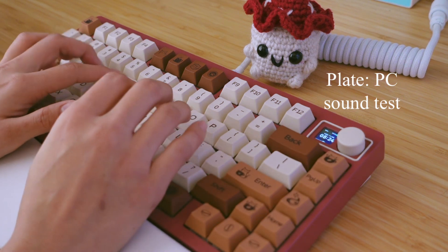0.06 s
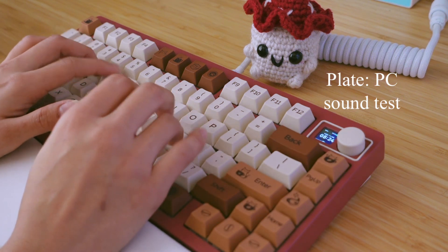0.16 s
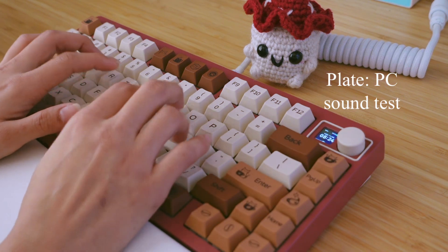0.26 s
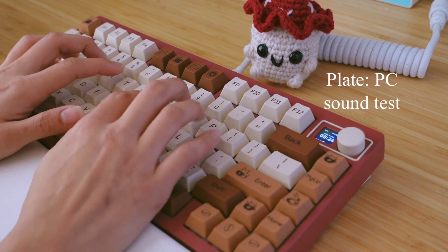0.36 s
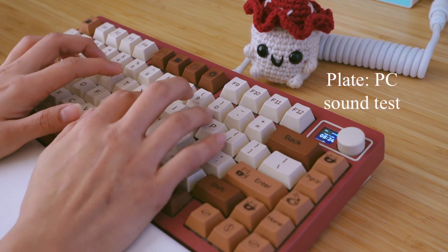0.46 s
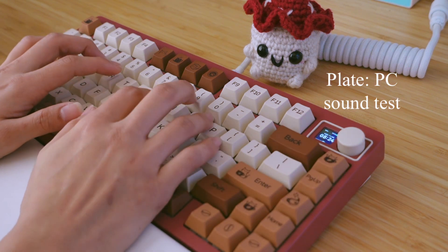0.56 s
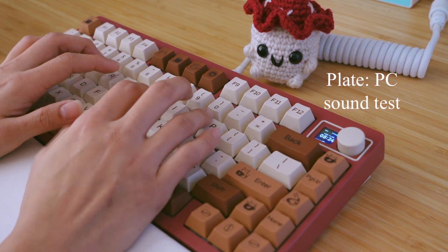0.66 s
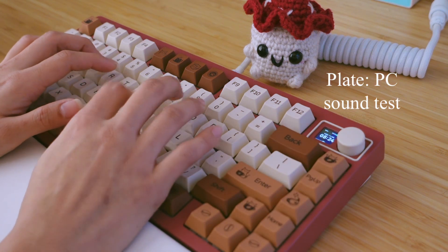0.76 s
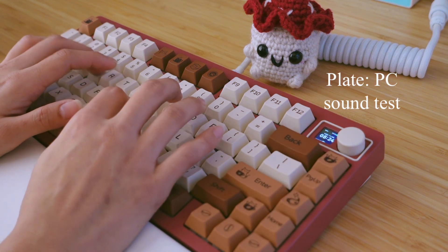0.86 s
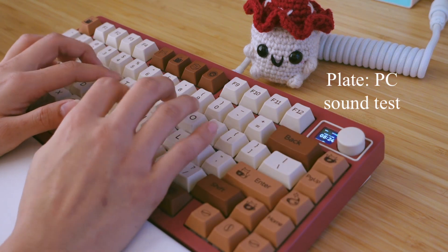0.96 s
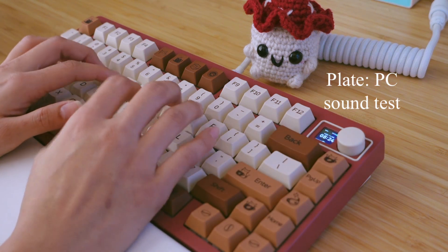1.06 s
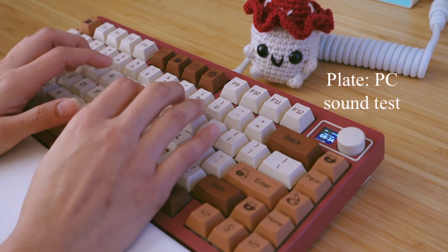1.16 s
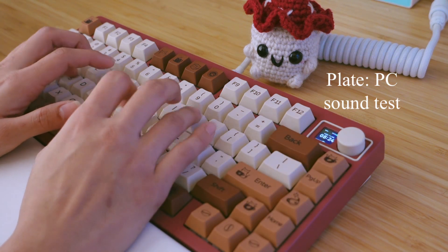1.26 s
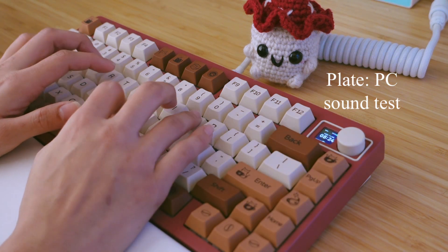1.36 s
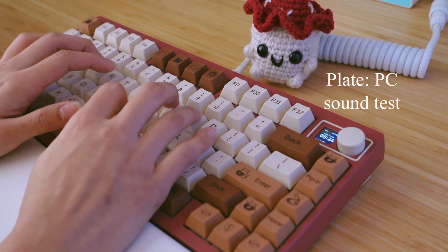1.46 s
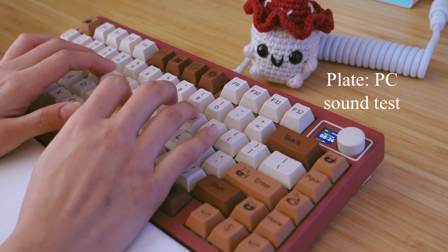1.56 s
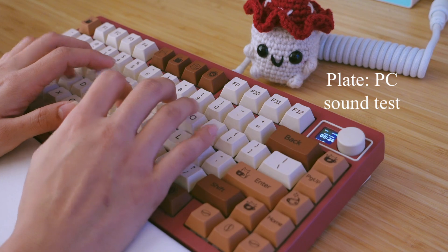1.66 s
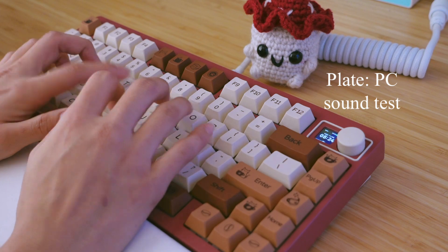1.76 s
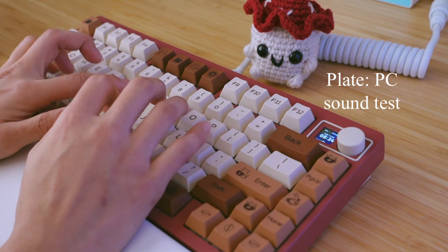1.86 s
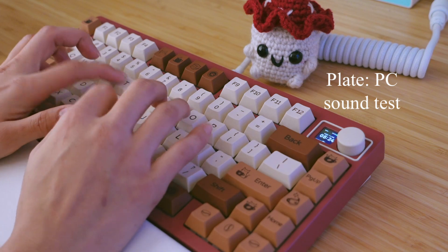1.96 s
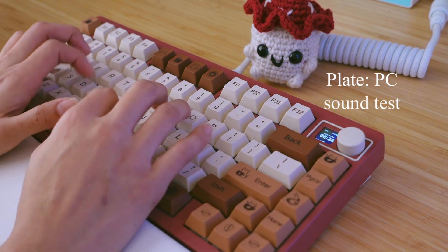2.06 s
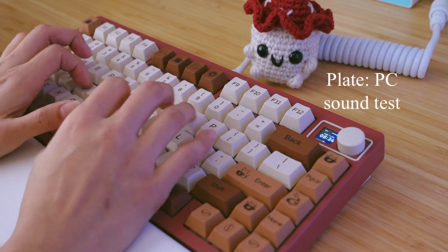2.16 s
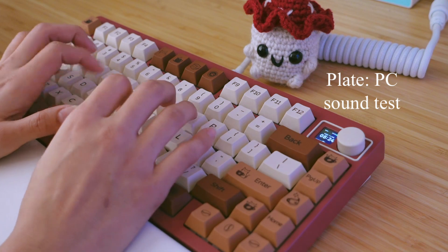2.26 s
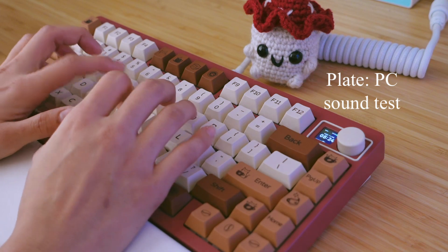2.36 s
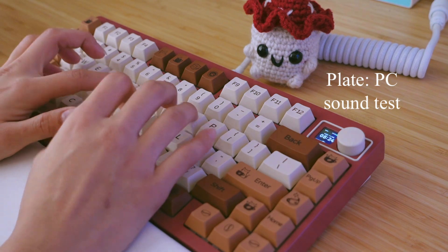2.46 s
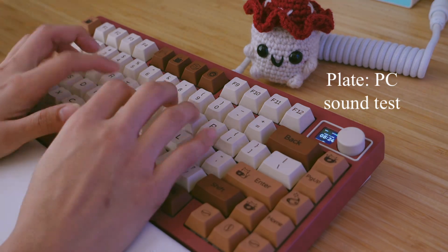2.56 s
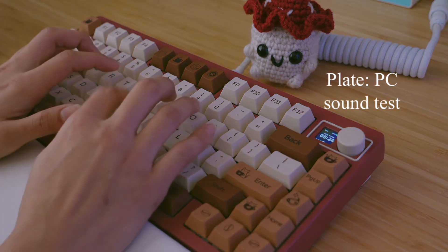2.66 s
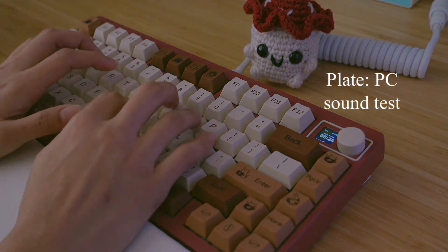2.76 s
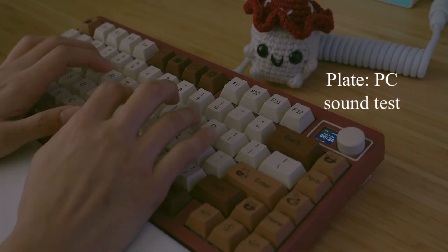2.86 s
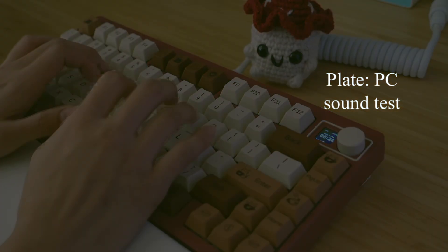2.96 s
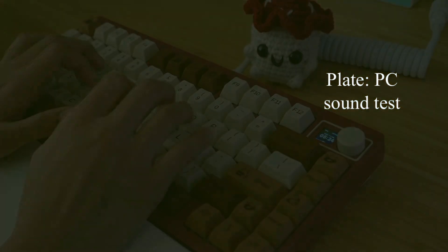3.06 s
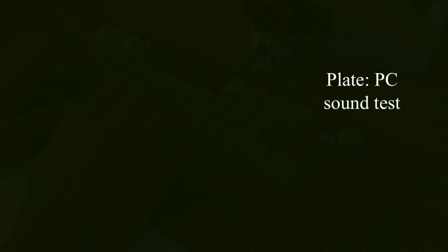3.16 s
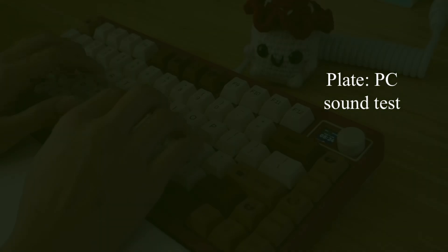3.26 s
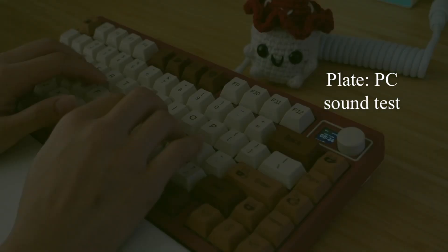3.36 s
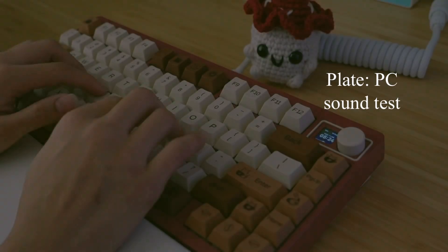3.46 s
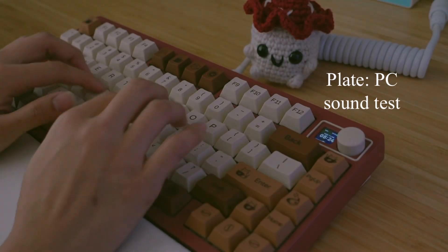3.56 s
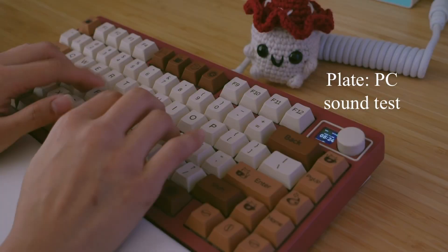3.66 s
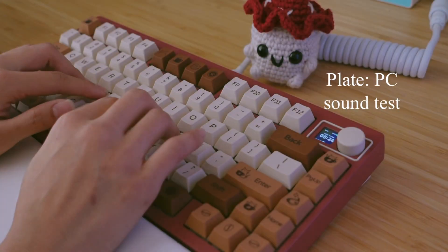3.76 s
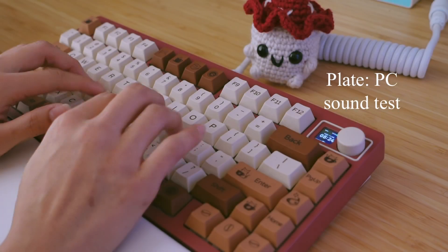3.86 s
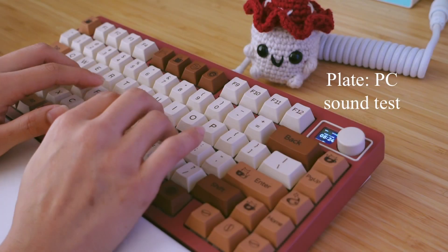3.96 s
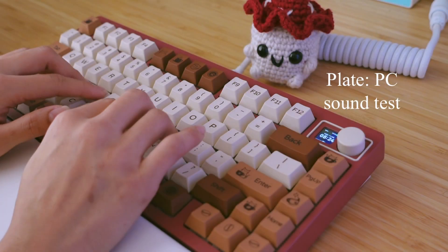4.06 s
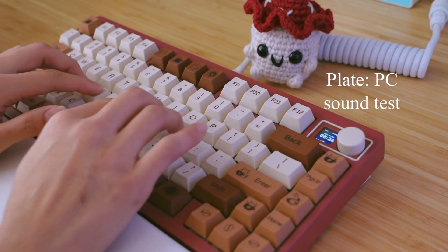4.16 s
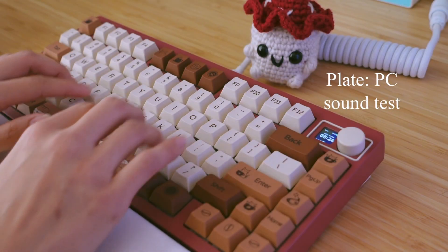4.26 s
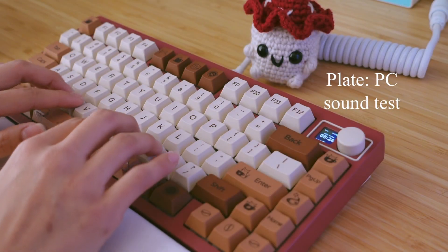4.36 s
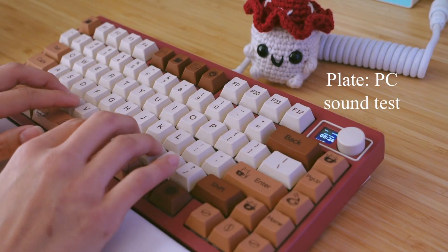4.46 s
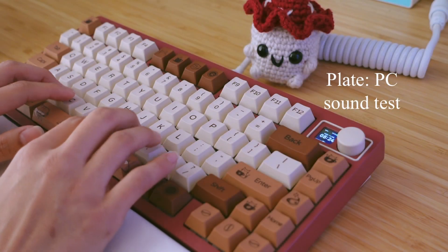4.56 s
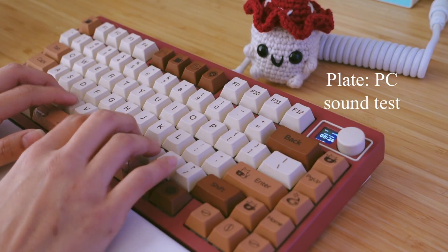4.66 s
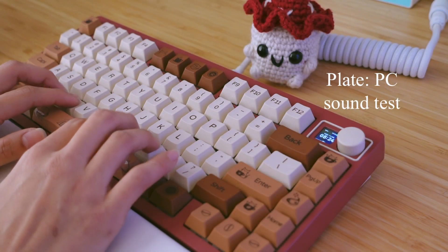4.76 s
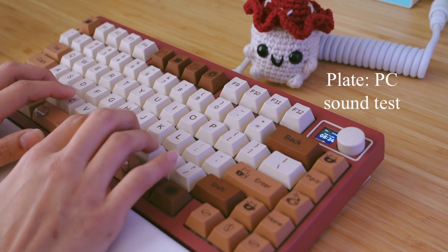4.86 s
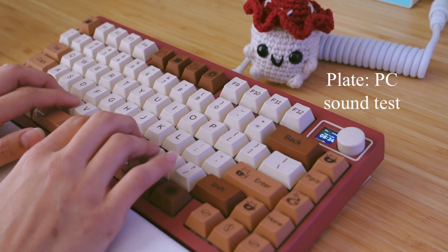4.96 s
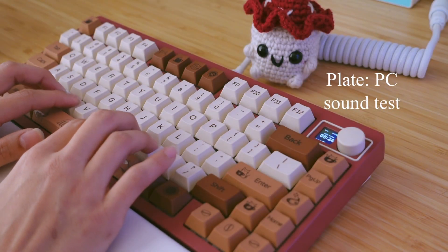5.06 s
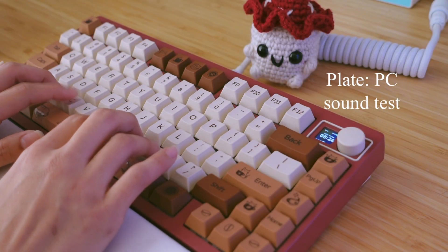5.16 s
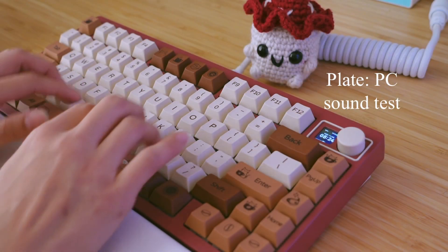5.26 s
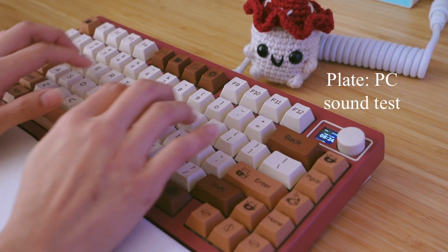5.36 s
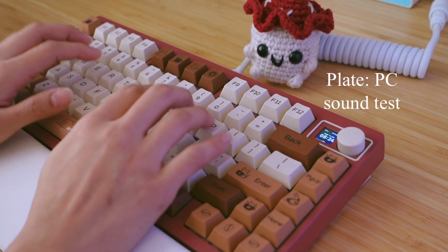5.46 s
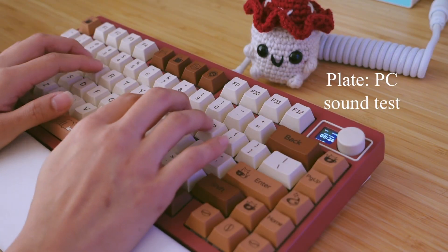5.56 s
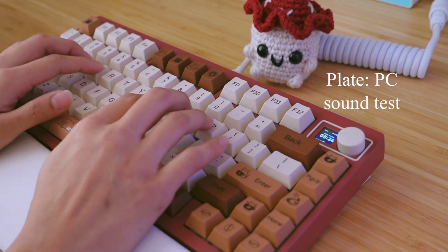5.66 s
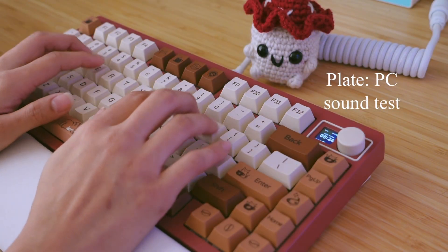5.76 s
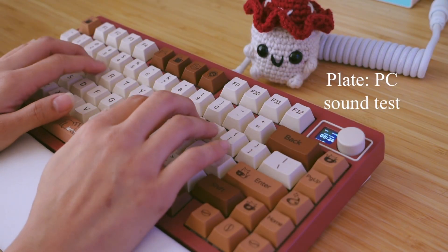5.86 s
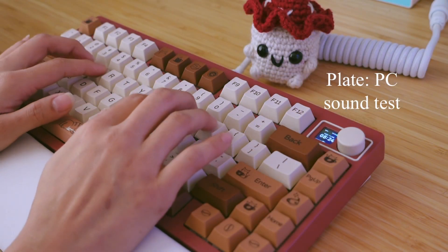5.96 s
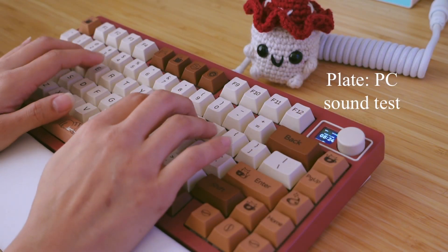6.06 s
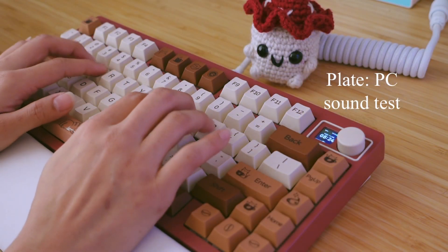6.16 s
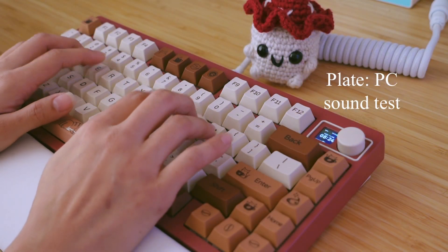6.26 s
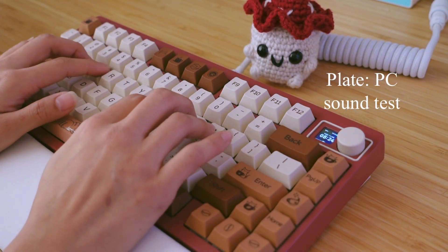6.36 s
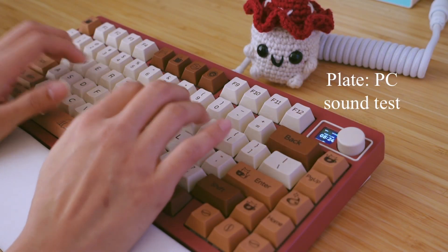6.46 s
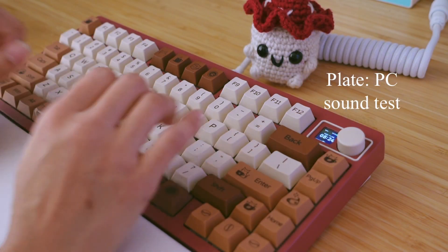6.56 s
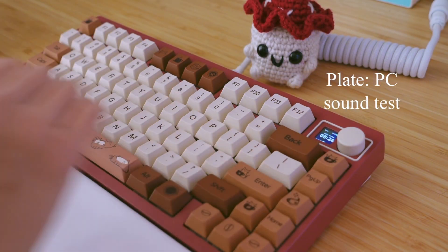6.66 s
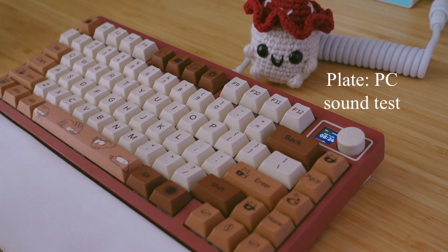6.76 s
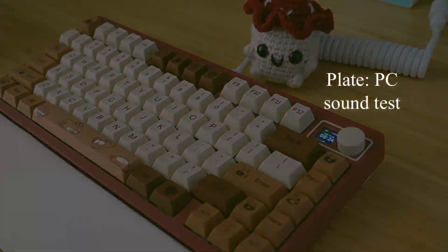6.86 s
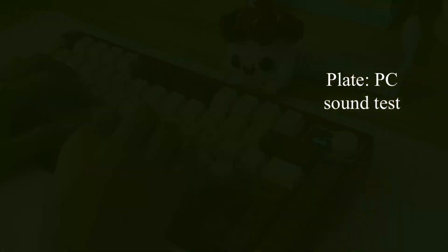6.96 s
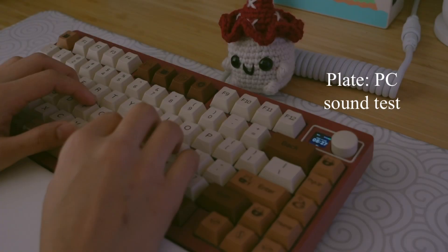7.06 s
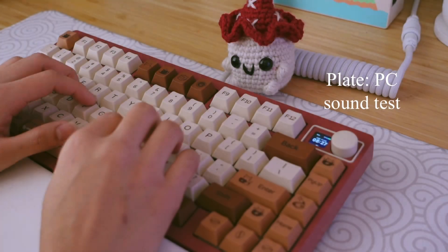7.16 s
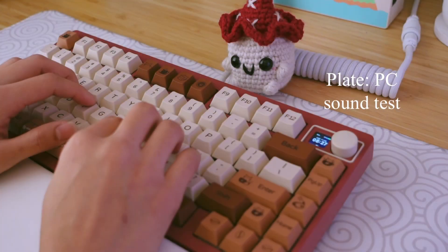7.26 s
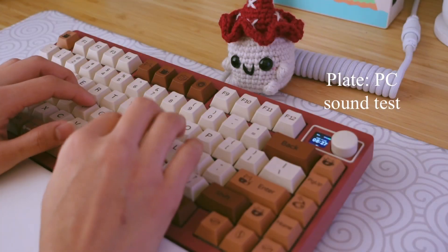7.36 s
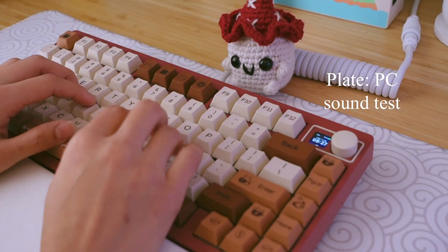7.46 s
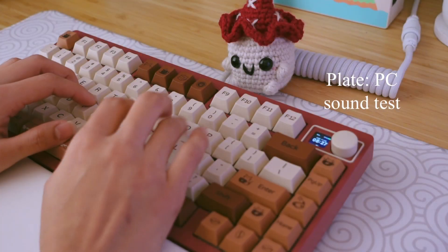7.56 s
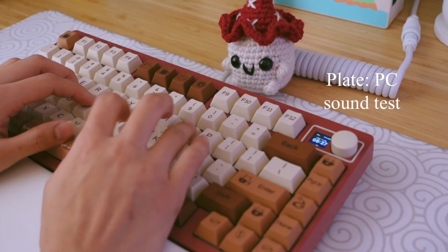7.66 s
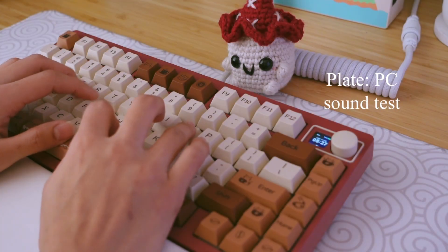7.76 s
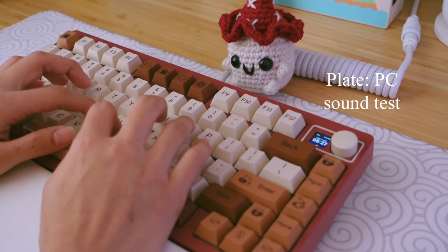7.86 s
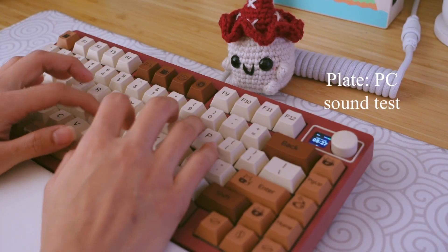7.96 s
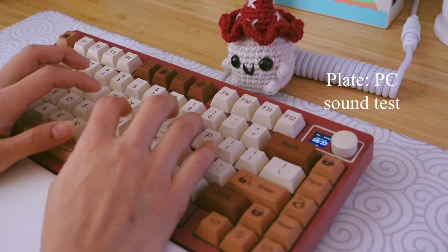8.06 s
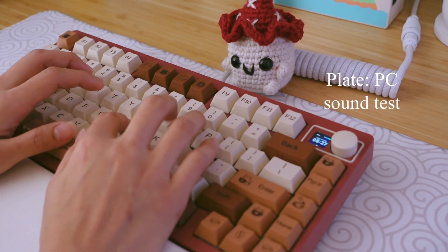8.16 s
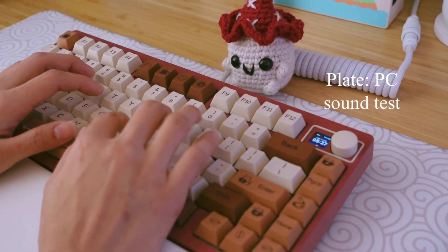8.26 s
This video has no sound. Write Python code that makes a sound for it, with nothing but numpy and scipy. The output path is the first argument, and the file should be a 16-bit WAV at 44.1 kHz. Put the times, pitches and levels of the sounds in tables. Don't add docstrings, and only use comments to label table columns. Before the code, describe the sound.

Close mechanical keyboard clatter at a wooden desk: steady words, fast rolling bursts with short gaps, then steady typing again on a mat.

```python
import sys
import numpy as np
from scipy import signal
from scipy.fft import rfft, irfft, next_fast_len
from scipy.io import wavfile
from scipy.ndimage import map_coordinates

SR = 44100
rng = np.random.default_rng(int(sys.argv[2]) if len(sys.argv) > 2 else 0)


def waveform_to_disk(signal):
    frames = np.transpose(np.atleast_2d(signal))
    scaled = np.clip(frames, -1, 1) * 32767
    samples = np.round(scaled).astype(np.int16)
    wavfile.write(sys.argv[1], SR, samples)


def volts_from_decibels(level):
    exponent = np.asarray(level, float) / 20
    return 10 ** exponent


N = 366910
SPAN = 4096

# start in seconds, knock in dB, keycap in Hz,
# plate in dB over the knock, tick in dB over the knock.
UPPER_ROLLS = [(3.3694, -19.5, 2700, -12, -3), (3.406, -20.5, 2160, -3, -1.5),
               (3.4269, -16.5, 2600.0, -11, -3), (3.469, -25, 2550, -18, -9),
               (3.491, -17.0, 2600, -37.0, -6.5), (3.532, -26, 2470, -5.5, -10.0),
               (3.5418, -25, 2330.0, -7, -12), (3.691, -28, 2340, -15, 6), (3.693, -16, 2760.0, -10, -7),
               (3.703, -17.5, 2530, -11, -2.5), (3.7389, -23, 2560.0, -13, -2),
               (3.7685, -21.5, 2500.0, -20, -9.0), (3.7748, -18.5, 2410.0, -21, -6),
               (3.845, -26, 2480.0, -4.5, -6), (3.86, -29.5, 2400, -1, -6), (4.0076, -20.5, 2900, -16, -6),
               (4.05, -28, 2600, -13, -10), (4.0153, -28, 2200, -5, -4), (4.0471, -21, 2600.0, -14.0, -7),
               (4.0724, -21, 2470, -21, -6.5), (4.115, -27, 2660, -26, -12), (4.1995, -27, 2190, -8, -3)]
# start in seconds, knock in dB, keycap in Hz,
# plate in dB over the knock, tick in dB over the knock.
MAT_WORDS = [(7.51, -18, 2420, -24, -3.5), (7.5854, -17, 2140, -13, -6), (7.6877, -11, 2430, -22, -5),
             (7.8229, -13, 2560, -14, -12), (7.9149, -20.5, 2400, -18, -10),
             (7.945, -22.5, 2130, -4, -11.5), (8.0243, -14, 2260, -11, -7.5), (8.1446, -18, 2500, -8.5, -7),
             (8.203, -14.5, 2430, -28.0, -6), (8.2702, -16, 2480, -16, -12.5)]


def along(points, hz):
    f, v = np.transpose(points)
    return np.interp(np.log(hz + 1), np.log(f + 1), v)


def mode(f, hz, width_hz):
    return 1j * f * width_hz / (hz * hz - f * f + 1j * f * width_hz)


def dying(t, db, t60):
    return volts_from_decibels(db - 60 * t / t60)


def peaked(response):
    return response / np.abs(irfft(response, SPAN)).max(-1, keepdims=True)


def place(times, sounds):
    out = np.zeros((2, N + SR))
    for s, sound in zip(times, sounds):
        out[:, round(s * SR):][:, :sound.shape[-1]] += sound
    return out[:, :N]


def spread(a, b, alike):
    u = np.arccos(np.clip(alike, 0, 1)) / 2
    return np.cos(u) * a + np.sin(u) * b, np.cos(u) * a - np.sin(u) * b


def scatter(rows, alike):
    a, b = np.moveaxis(rng.standard_normal((rows, 2, SPAN)), 1, 0)
    return np.stack(spread(a, b, alike), 1)


def chances(rows, count):
    return rng.standard_normal((rows, count)).T[:, :, None, None]


def per_key(table, s, usual):
    at, value = np.transpose(table)
    apart = np.abs(s[:, None] - at)
    return np.where(apart.min(1) < .002, value[apart.argmin(1)], usual)


def thuds(rows, hz, width_hz, t60, db, push_db=-20):
    s, level_db = np.transpose(rows)[:, :, None, None]
    f = np.fft.rfftfreq(SPAN, 1 / SR)
    puff = dying(np.arange(SPAN) / SR, 0, t60) * scatter(len(s), alike=0.97)
    knock = irfft((volts_from_decibels(push_db) + rfft(puff)) * mode(f, hz, width_hz) ** 2, SPAN)
    return place(s.ravel(), volts_from_decibels(level_db + db) * knock / np.abs(knock).max((1, 2), keepdims=True))


def air():
    # frequency in Hz, level in dB per Hz.
    hiss = [(25, -50), (60, -26.5), (100, -15.5), (125, -6), (250, -6), (370, -10), (700, -15), (1900, -21),
            (2700, -27), (4000, -33), (6500, -39.5), (10000, -44.5), (15000, -46), (16600, -53)]
    # frequency in Hz, width in Hz, level in dB over the hiss.
    ducts = [(215.5, 17, 11.5), (314.5, 10.5, 9.5), (995, 3.6, 0), (2335, 10, -9), (4274, 68, 8.5)]
    # time in seconds, level in dB.
    loudness = [(0.0, -45.5), (0.88, -45), (6.7, -46), (7.1, -47), (8.32, -46)]
    # frequency in Hz, likeness from 0 to 1.
    likeness = [(60, 0.97), (380, 0.95), (2380, 0.61), (15000, 0.74)]
    # frequency in Hz, left minus right in dB.
    lean = [(60, 1.5), (380, -3), (2380, -4), (15000, 1.5)]
    t, m = np.arange(N) / SR, next_fast_len(N)
    f = np.fft.rfftfreq(m, 1 / SR)
    a, b = rfft(rng.standard_normal((2, m)))
    pair = np.array(spread(a, b, along(likeness, f)))
    lines = sum(volts_from_decibels(g) * np.abs(mode(f, hz, width)) ** 2 for hz, width, g in ducts)
    colour = volts_from_decibels(along(hiss, f)) * (1 + lines)
    noise = irfft(colour * pair * volts_from_decibels(np.outer([.5, -.5], along(lean, f))), m)[:, :N]
    drift_db = 0.8 * map_coordinates(rng.standard_normal(64), [t * 3])
    level_db = np.interp(t, *np.transpose(loudness)) + 1.5 + drift_db
    return volts_from_decibels(level_db) * noise / noise.std()


def contacts():
    # start in seconds, knock in dB, keycap in Hz, plate and tick in dB over the knock.
    words = [(0.064, -14.5, 2500.0, -23, -5), (0.1182, -17.5, 2640, -17, -1.5),
             (0.172, -17.5, 1920, -8, -12), (0.2252, -14.5, 2600.0, -15, -2),
             (0.3006, -22.5, 2500.0, -9, -13), (0.587, -24, 2940, -9, -14), (0.7473, -23.5, 2500, -5, -8),
             (0.835, -19, 2520.0, -19.0, -7.5), (0.9084, -17.5, 2710, -16, -3.5),
             (0.9768, -15.5, 2600.0, -15, -5.5), (1.0778, -20, 2600.0, -16, -5),
             (1.157, -21, 2500.0, -6.5, -5.5), (1.3334, -14.0, 2600, -11.5, -10),
             (1.423, -13.5, 2720, -9, -10), (1.526, -20.5, 2380, -7, -12), (1.586, -14.5, 2820, -12, -2.5),
             (1.7275, -14.5, 2650, -8, -2), (1.8503, -14.5, 2380.0, -12, -8.5),
             (1.9234, -10, 1990, -16, -8.5), (2.031, -12.5, 2740, -12, -10),
             (2.2501, -16.5, 2360, -8.5, -8.5), (2.3405, -12.5, 2030, -41, -6),
             (2.4557, -16.5, 2400, -13, -9), (2.5478, -18.0, 2380, -3.5, -8), (2.6627, -15, 2870, -9.5, -6),
             (2.7582, -19, 2600.0, -21, -11), (2.8026, -10, 2600, -15, -8), (2.8755, -27, 2430.0, -4, -10),
             (2.9334, -15.5, 2700, -12.5, -2)]
    middle = [(4.6806, -18.0, 2770, -4.5, -6.5), (4.6932, -23.5, 2200, -7, -18),
              (4.7224, -16, 2620, -2, -10), (4.7579, -18.5, 2370, -2.5, -10),
              (4.921, -22.5, 2040, -18, -14), (4.9435, -18, 2730, -5.5, -9),
              (4.9737, -20.5, 2730, -10.0, -20), (4.986, -20.5, 2500, -2.5, -12),
              (5.0175, -16.5, 2600.0, -7.5, -10), (5.079, -18.5, 2430, -4, -8.5),
              (5.206, -20.5, 2650, -8.5, -10.5), (5.256, -23, 2700.0, -4.5, -20),
              (5.3113, -26.5, 2330, 4.5, -34)]
    mash = [(5.8294, -19, 2820, -10, -3), (5.8314, -15, 2270, -8.5, -8), (5.857, -17.5, 2600.0, -11.5, -8),
            (5.8704, -22.5, 2900, -6, -1), (5.9073, -14, 2540.0, -12.5, -8),
            (5.9259, -18.5, 2600.0, -13, -1), (6.073, -16, 2660, -10, -8), (6.084, -10, 2430, -17, -9),
            (6.129, -16.5, 2560, -12, -7), (6.1647, -19.5, 2510, -11, -2.5),
            (6.3055, -16.5, 2700, -7.5, -5), (6.324, -14, 2600.0, -11, -13),
            (6.327, -14.5, 2270, -17.0, -8), (6.341, -17.5, 2640, -2.5, -2), (6.351, -9.5, 2500.0, -16, -8),
            (6.3706, -18.5, 2670, -13, -2), (6.4571, -26.5, 2200, -4, 3), (6.477, -24, 2440.0, -7, -27)]
    # start in
    # seconds, knock in dB, plate in dB over the knock.
    returns = [(0.193, -32, -3), (0.29, -32, 0), (0.45, -33.5, -11), (0.561, -40.5, -42), (0.658, -39.5, 2),
               (0.681, -36.5, -5), (0.933, -31, -6), (1.133, -35.5, 0.5), (1.2652, -35, -3.5),
               (1.323, -54.5, 17), (1.5547, -35.5, 11), (1.6296, -49, 8), (1.685, -40.5, 10),
               (1.8472, -46, -11), (1.98, -34, 0), (2.0678, -36.5, 4.5), (2.148, -32.5, 6),
               (2.1766, -28.5, -24), (2.532, -40, 11.5), (2.652, -37, -2), (3.0875, -37, 0.5),
               (5.298, -38, 9), (5.302, -38, 9), (7.029, -46, -23), (7.0824, -45, -21), (7.9014, -30, -5),
               (8.016, -28, 0),
               (3.524, -38, 5), (3.5944, -42, -2), (3.613, -31, -9), (3.8976, -31, -9), (3.914, -33, -5),
                (3.9677, -41, -32), (4.1673, -29.5, -4), (4.228, -33.5, -3), (4.317, -40.5, -27),
                (4.807, -40, 11), (4.819, -33, -2), (4.831, -42, 9), (4.8766, -34, 6.5), (4.882, -29.5, 2),
                (5.102, -45, 13), (5.114, -42, 10), (5.136, -41, 13.5), (5.217, -33, 0), (5.2836, -41, 8),
                (5.2862, -42, 8), (5.2918, -33.5, 10), (5.296, -33, 1), (5.316, -36, 0), (5.322, -38, -3),
                (5.294, -32, -3), (5.946, -33, -12), (5.9665, -41, 10.5), (6.0295, -37.5, 2.5),
                (6.051, -38.5, 1), (6.117, -31, 0), (6.194, -41, 10), (6.202, -34, -5), (6.212, -45.5, 11),
                (6.219, -40.5, 8), (6.246, -33, -3), (6.4594, -35.5, 9.5), (6.4634, -33, -1),
                (6.466, -32, -5), (6.4674, -30, -4), (5.52, -44.5, 10.5)]
    # start in seconds, knock in dB, tick in dB over the knock.
    rubbing = [(0.0928, -37.5, 7), (0.825, -48, 3), (0.8818, -39.5, 2.5), (0.95, -42, 2),
               (1.2255, -43.5, 4.5), (1.3979, -31, -2), (1.566, -34, -3), (1.7052, -36, 0),
               (2.006, -30.5, -2), (2.1303, -35.5, -3.5), (2.646, -51.5, 11), (2.7963, -58, -14.5),
               (2.8677, -47, 4), (2.9073, -37, -5), (3.392, -47, 4), (3.476, -48, -12), (3.6364, -39, -4),
               (3.6517, -34, -5), (4.187, -32, -12), (4.1916, -33, -5), (4.2101, -35, -4), (5.249, -37, -7),
               (5.996, -39, -12), (6.573, -39.5, -21), (6.6159, -32, -0.5), (7.496, -37, -4),
               (7.7877, -36.5, -11), (7.889, -45, -4), (8.125, -48, 0)]
    # start in seconds, push on the desk in dB, thin top of the slider in dB,
    # slider tick in dB over the knock.
    passages = [
        (0, 0.5, -1, -38),
        (3.2, 0.5, -20, -23),
        (4.5, -2, -7.5, -23),
        (5.6, 0.5, -6, -14),
        (6.8, -11, -10, -20),
    ]
    passage_plate_hz = [1328, 1245, 1250, 1245, 1250]
    passage_shell_db = [-8, -5.5, -9, -3, -6.5]
    # start in seconds, plate in Hz.
    spots = [(0.1183, 1490), (0.172, 1480), (0.2253, 1330), (0.3007, 1390), (0.7473, 1400), (0.835, 1460),
             (0.9769, 1350), (1.0778, 1200), (1.157, 1400), (1.3335, 1370), (1.423, 1430), (1.5257, 1380),
             (1.586, 1260), (1.7276, 1430), (1.9234, 1480), (2.031, 1440), (2.1486, 1310), (2.6628, 1290),
             (2.9336, 1440), (3.0875, 1190), (3.406, 1400), (3.491, 1180), (3.703, 1540), (4.0471, 1550),
             (4.0724, 1450), (4.1995, 1120), (4.6806, 1240), (4.7579, 1290), (5.0175, 1370), (5.078, 1350),
             (5.206, 1210), (5.295, 1510), (5.833, 1380), (5.857, 1360), (5.9072, 1430), (6.073, 1350),
             (6.129, 1420), (6.3055, 1360), (6.351, 1430), (6.4635, 1540), (7.5854, 1100), (7.6876, 1430),
             (7.8229, 1390), (7.901, 1410), (7.945, 1070), (8.016, 1080), (8.0244, 1420), (8.1446, 1150),
             (8.2702, 1410), (5.5202, 1010), (1.3978, 1250)]
    # start in seconds, change in dB.
    coupling = [(0.064, 2), (0.172, 0), (0.2253, 4), (0.835, -3), (0.9083, 2), (0.9769, 2), (1.3335, 5),
                (1.423, -6), (1.5257, -7), (1.586, 2), (1.7276, 2), (1.8503, 0), (1.9234, -1), (2.031, -3),
                (2.2501, -5), (2.3405, 1), (2.4557, 1), (2.5478, -5), (2.6628, 1), (2.8025, 2), (2.9336, 3),
                (3.3694, 3), (3.406, -5), (3.4271, 3), (3.491, -1), (3.693, 3), (3.7747, 1), (4.0471, -2),
                (4.0724, -2), (4.6806, -2), (4.7224, -2), (4.7579, -2), (4.9434, 0), (5.0175, -3),
                (5.078, -1), (5.206, -2), (5.8313, -2), (5.857, -1), (5.9072, -2), (5.9258, 0), (6.084, 1),
                (6.129, 0), (6.3055, -3), (6.327, 1), (6.351, 1), (7.5854, 3), (7.6876, 3), (7.8229, -2),
                (7.9149, 0), (8.0244, 0), (8.1446, -1), (8.203, 1), (8.2702, -1.5)]

    strokes = np.array(words + UPPER_ROLLS + middle + mash + MAT_WORDS)
    backs, rubs = np.array(returns), np.array(rubbing)
    s, db = np.concatenate([strokes[:, :2], backs[:, :2], rubs[:, :2]]).T
    back = slice(len(strokes), len(strokes) + len(backs))
    start, *manner = np.transpose(passages)
    passage = np.maximum(np.searchsorted(start, s) - 1, 0)
    settings = np.array([*manner, passage_plate_hz, passage_shell_db])
    push_db, top_db, tick_db, plate_hz, shell_db = settings[:, passage]
    plate_hz = per_key(spots, s, plate_hz)
    shell_db = shell_db + per_key(coupling, s, 0)

    own = rng.standard_normal((len(s), 3)).T
    plate_db = np.concatenate([strokes[:, 3], backs[:, 2], np.full(len(rubs), -5.5)])
    back_hz = 2380 - 22 * backs[:, 2] + 120 * own[0, back]
    hz = np.concatenate([strokes[:, 2], back_hz, np.full(len(rubs), 2600)])
    tick_db = tick_db + 7 * (hz - 2500) / 1e3 - 0.067 * (plate_db + 10) - 8 * own[1]
    tick_db[back] += 7.5
    tick_db = np.minimum(tick_db, -19)
    tick_db[-len(rubs):] = rubs[:, 2]
    rub = np.clip((tick_db + 19.0) / 10, 0, 1)
    tick_db[:len(strokes)] = -13.5 + strokes[:, 4]
    rattle_db = -13 - 0.22 * np.maximum(db + 22.0, -10) + 1.5 * own[2]
    return np.array([s, db, hz, plate_db, tick_db, rattle_db, rub, shell_db, plate_hz, push_db, top_db])


def keycap(f, soft, hz, db, tick_db, rub, own):
    stem_db = -12.5 + .4 * (1 - rub) * np.clip(db + 22, -15, 0)
    stem_db = stem_db + 1.54 * np.minimum(tick_db + 18.5, 10) + 2.8 * own[4]
    stem = volts_from_decibels(stem_db) * mode(f, 4500 + 350 * own[5], width_hz=2720) ** 2
    return peaked(soft * (stem - mode(f, hz, width_hz=1193) ** 2))


def slider_ring(f, rub, top_db, own):
    # frequency in Hz, width in Hz, level in dB.
    slider_modes = [(10360, 2800, -4.5), (12350, 1100, -9), (14000, 3300, -8), (7780, 2100, -13.5)]
    ring = 0
    for k, (hz, width, g) in enumerate(slider_modes):
        level_db = g + 3 * own[k] + (hz > 12000) * top_db
        ring = ring + (-1) ** k * volts_from_decibels(level_db) * mode(f, hz, width) ** 2
    return peaked(ring + rub * volts_from_decibels(41) * mode(f, 5600, width_hz=6200) ** 2)


def reflections(f, count, shell_db):
    # delay in seconds, level in dB.
    surfaces = [(.0034, -15), (.0059, -14), (.008, -16), (.0113, -14), (.0178, -24)]
    chance = rng.standard_normal((count, 2, len(surfaces)))
    moved_s = .0002 * chances(count, len(surfaces))
    echo = 0
    for k, (delay, g) in enumerate(surfaces):
        echo = echo + volts_from_decibels(g + 1.6 * chance[..., [k]]) * np.exp(-2j * np.pi * f * (delay + moved_s[k]))
    return echo * (volts_from_decibels(-14) + volts_from_decibels(shell_db + 5) * mode(f, 2500, width_hz=700))


def shell(f, count, shell_db):
    # frequency in Hz, width in Hz, struck level in dB, level in the echoes in dB.
    shell_modes = [(2520, 110, -0.5, -23), (1506, 34, -20, 0), (1970, 190, -9.5, 0.5), (3320, 30, -37, -20)]
    lively = shell_db + 2.0 * chances(count, len(shell_modes))
    struck = echoed = 1
    for (hz, width, struck_db, echoed_db), g in zip(shell_modes, lively):
        struck = struck + volts_from_decibels(struck_db + g) * mode(f, hz, width)
        echoed = echoed + volts_from_decibels(echoed_db + g) * mode(f, hz, width)
    return struck, echoed


def hollow_case(f, count, plate_db, shell_db, own):
    level_db = shell_db + 3.5 - .3 * np.clip(plate_db + 15, -5, 15) + own[0]
    case = volts_from_decibels(-4) + volts_from_decibels(level_db) * mode(f, 2530 + 60 * own[1], width_hz=200)
    case = case + volts_from_decibels(3) * mode(f, 5800, width_hz=2300)
    walls_hz = 2300 * np.exp(0.37 * chances(count, 5))
    return case + volts_from_decibels(-5.0) * mode(f, walls_hz, width_hz=200).sum(0)


def keys(hits):
    s, db, hz, plate_db, tick_db, rattle_db, rub, shell_db, plate_hz, _, top_db = hits[:, :, None, None]
    t, f = np.arange(SPAN) / SR, np.fft.rfftfreq(SPAN, 1 / SR)
    count = len(s)
    own = chances(count, 6)
    contact_hz = 5080 * volts_from_decibels(0.75 * np.clip(db + 17, -24, 0))
    soft = 1 / (1 + 1j * f / contact_hz) ** 3
    cap = keycap(f, soft, hz, db, tick_db, rub, own)
    plate_hz = plate_hz * (1 + 0.0081 * rng.standard_normal(db.shape))
    bend = (1 + 0.97 * plate_hz / (1j * f + 1)) ** 3
    plate = -peaked(soft * mode(f, plate_hz, width_hz=650) ** 2 / bend)

    seated = volts_from_decibels(-2.5 / (1 + np.exp((0.0092 - t) / 0.00055)))
    rattle = dying(t, rattle_db - 19.5, t60=0.031) + dying(t, rattle_db - 25, t60=0.25)
    rattle = seated * (1 - np.exp(-t / 0.00041)) * rattle
    echo = reflections(f, count, shell_db)
    struck, echoed = shell(f, count, shell_db)
    case = hollow_case(f, count, plate_db, shell_db, own)
    blow = struck + echo * echoed + case * rfft(rattle * scatter(count, alike=0.77))
    low = blow * (volts_from_decibels(3.5) * cap + volts_from_decibels(plate_db + 1.5) * plate)
    foam_hz = 0.67 * plate_hz
    low = low * (f * f / (f * f - foam_hz ** 2 - 1.1j * f * foam_hz))
    hollow = (1 - np.exp(-t / 0.002)) * dying(t, -33.5, t60=0.13) * scatter(count, alike=0.88)
    low = low + rfft(hollow) * peaked(mode(f, 1930, width_hz=1640) ** 2)

    snap = rfft(dying(t, -5 - 4 * rub, t60=0.0033) * scatter(count, alike=0.93))
    snap = snap / (1 + 1j * (f / 12500) ** 6)
    leaves_hz = 9000 * np.exp(0.36 * chances(count, 4))
    banded = volts_from_decibels(-2) + volts_from_decibels(1.0) * mode(f, leaves_hz, width_hz=340).sum(0)
    chatter = seated * dying(t, rattle_db - 11.0 + 4 * rub, t60=0.064) + dying(t, -38.5, t60=0.44)
    high = banded * (snap + rfft(chatter * scatter(count, alike=0.87)))
    high = high * volts_from_decibels(tick_db + [[.8], [-.8]]) * slider_ring(f, rub, top_db, own)
    return place(s.ravel(), volts_from_decibels(db) * irfft(low + high, SPAN))


def desk(hits):
    s, db, *_, push_db, _ = hits
    push = np.transpose([s, 0.51 * db + push_db + 2 * rng.standard_normal(len(s))])
    wood = thuds(push, hz=137.0, width_hz=65.0, t60=0.092, db=-32.5)
    return wood + thuds(push, hz=374, width_hz=1380, t60=0.054, db=-27.5)


def room(x, t60, db):
    t = np.arange(SR // 2) / SR
    tail = (1 - np.exp(-t / 0.0062)) * dying(t, 0, t60) * rng.standard_normal((2, len(t)))
    return volts_from_decibels(db) * signal.fftconvolve(x, tail / np.linalg.norm(tail[0]), axes=1)[:, :N]


def space_bar():
    # start in seconds, level in dB.
    landings = [
        (0.3035, -34),
        (0.7497, -31),
        (1.1597, -30),
        (1.528, -31),
        (2.2527, -28),
        (2.5502, -27),
        (5.5207, -32),
    ]
    # frequency in Hz, level in dB, t60 in seconds.
    body_modes = [(222.5, 1, 0.18), (342, -3, 0.096), (563, -1.5, 0.074), (700, -1.5, 0.054)]
    s, db = np.transpose(landings)[:, :, None, None]
    t = np.arange(SPAN) / SR
    ring = 0
    for (hz, g, t60), own in zip(body_modes, chances(len(s), len(body_modes))):
        ring = ring + dying(t, g + 1.5 * own, t60) * np.sin(2 * np.pi * hz * t)
    return place(s.ravel(), -volts_from_decibels(db - 4.5 + [[1.2], [-1.2]]) * (1 - np.exp(-t / 0.00088)) * ring)


def hands():
    # start in seconds, length in seconds, level in dB.
    brushes = [
        (0.378, 0.032, -63),
        (2.86, .04, -71),
        (4.194, 0.19, -61),
        (5.3, 0.21, -69),
        (6.378, 0.36, -58),
    ]
    t, m = np.arange(N) / SR, next_fast_len(N)
    f = np.fft.rfftfreq(m, 1 / SR)
    skin = mode(f, 2400, width_hz=1400) + volts_from_decibels(-31) * mode(f, 13000, width_hz=8200)
    noise = irfft(rfft(rng.standard_normal((2, m))) * skin, m)[:, :N]
    grain = volts_from_decibels(2 * map_coordinates(rng.standard_normal(2048), [t * 90]))
    swell = sum(volts_from_decibels(db) * np.sin(np.pi * np.clip((t - s) / length, 0, 1)) for s, length, db in brushes)
    return swell * grain * (noise[0] + 0.49 * noise) / noise.std()


def bar_wire():
    # start in seconds, peak in dB.
    shakes = [
        (0.75, -42.5),
        (1.16, -42),
        (1.528, -42),
        (2.253, -36),
        (2.55, -36),
        (8.026, -36),
    ]
    return thuds(shakes, hz=5130, width_hz=500, t60=0.026, db=2.5)


def case_floor():
    drummed = np.array(MAT_WORDS + UPPER_ROLLS)[:, :2]
    return thuds(drummed, hz=810, width_hz=300, t60=0.038, db=-26, push_db=21)


def long_keys():
    # start in seconds, peak in dB.
    landed = [
        (4.192, -33),
        (5.246, -33),
        (5.2515, -31),
        (6.482, -33),
        (7.945, -48),
    ]
    return thuds(landed, hz=374, width_hz=680, t60=0.13, db=4.5, push_db=24.0)


def springs():
    # start in seconds, level in dB, frequency in Hz, t60 in seconds.
    pings = [
        (5.3, -68, 11330, .5),
        (5.3, -68, 11560, .5),
        (7.29, -66, 10800, .2),
    ]
    s, db, hz, t60 = np.transpose(pings)[:, :, None, None]
    t = np.arange(SPAN) / SR
    waver = .11 * np.cumsum(rng.standard_normal((len(s), 1, SPAN)), axis=2)
    swell = np.hanning(len(t)) ** .3
    return place(s.ravel(), dying(t, db, t60) * swell * np.sin(2 * np.pi * hz * t + waver) * [[1], [1]])


def fingernail():
    # start in seconds, peak in dB.
    flicks = [
        (7.0005, -45.5),
    ]
    return thuds(flicks, hz=7800, width_hz=3600, t60=0.043, db=0.5)


def scene():
    hits = contacts()
    board = keys(hits) + desk(hits) + space_bar() + bar_wire()
    board = board + case_floor() + long_keys() + fingernail()
    near = board + room(board, t60=0.93, db=-25.5) + springs() + hands()
    return near * volts_from_decibels([[-.4], [.4]]) + air()


def roll_off(x):
    return signal.sosfilt(signal.butter(12, 16820, fs=SR, output="sos"), x)


def record(dry):
    m = next_fast_len(N)
    f = np.fft.rfftfreq(m, 1 / SR)
    edge = volts_from_decibels(-26 * (f > 15850) - 60 * (f > 16600))
    mix = irfft(rfft(dry, m) * edge, m)[:, :N]
    return roll_off(mix)


dry = scene()
out = record(dry)
waveform_to_disk(out)
```